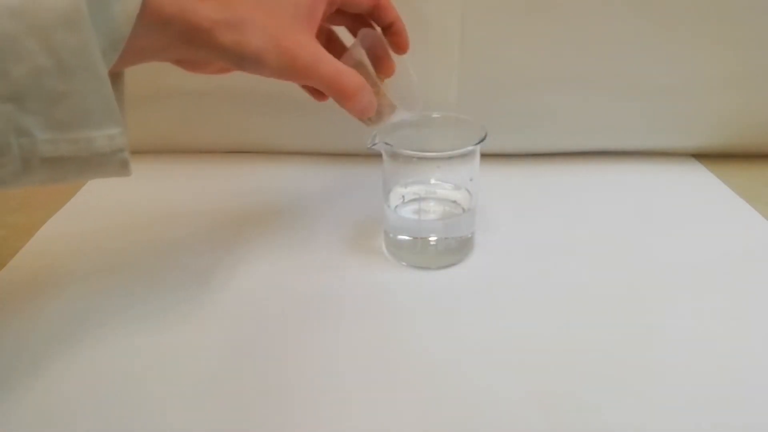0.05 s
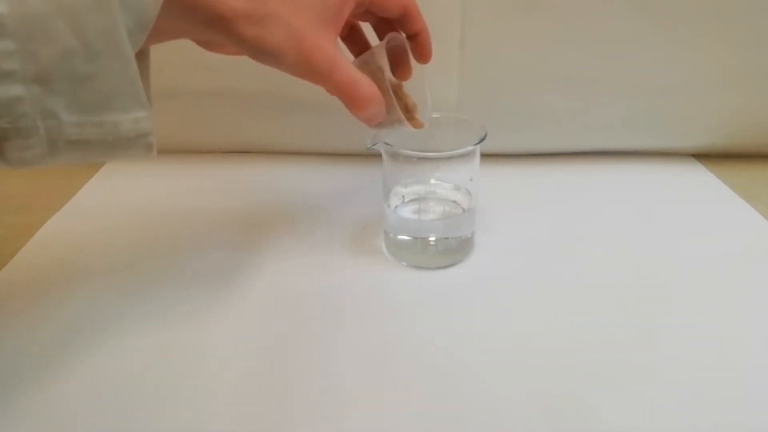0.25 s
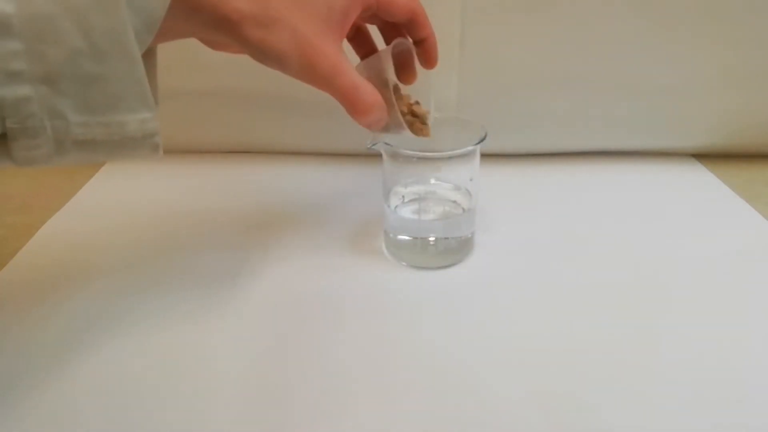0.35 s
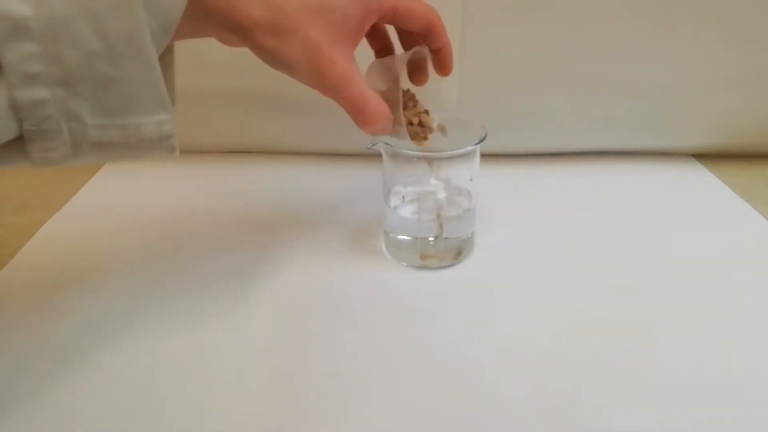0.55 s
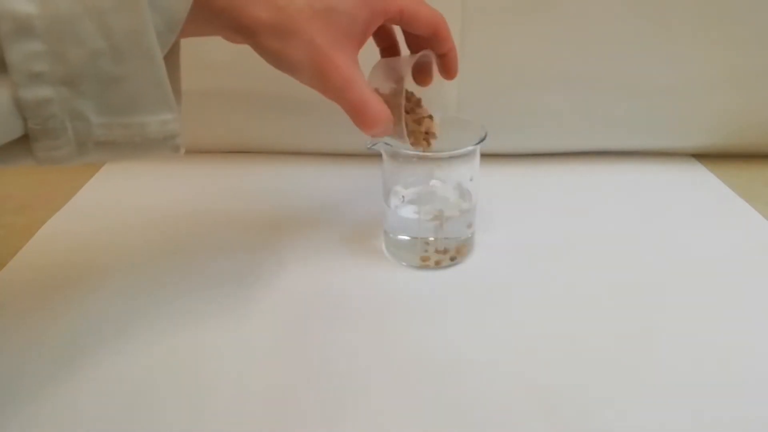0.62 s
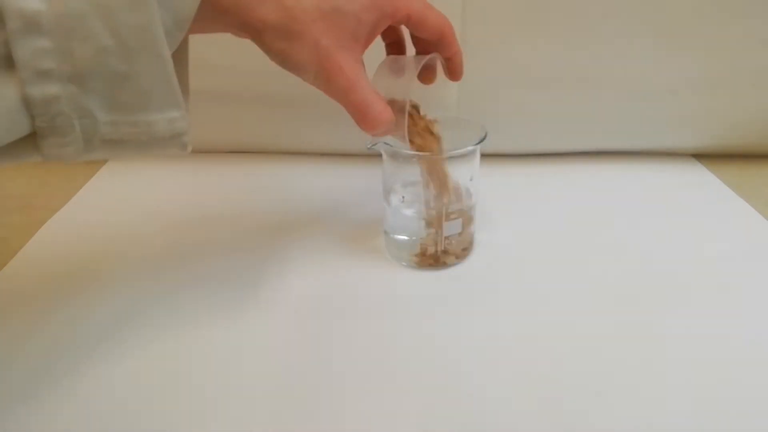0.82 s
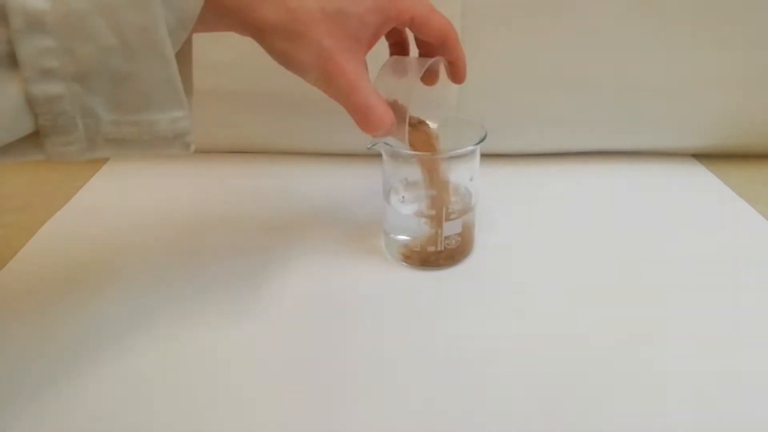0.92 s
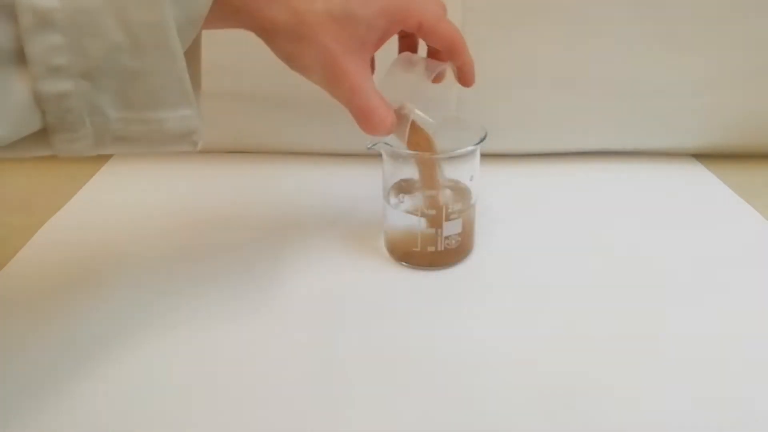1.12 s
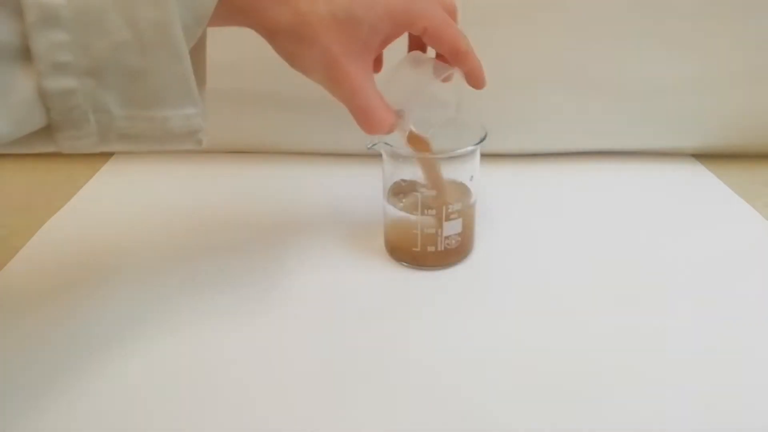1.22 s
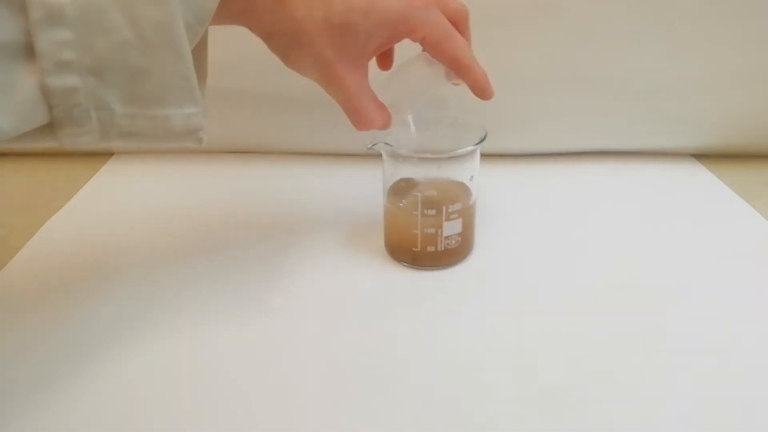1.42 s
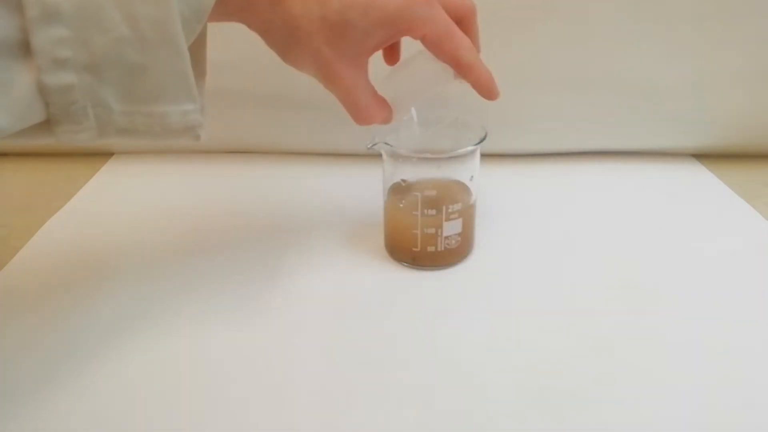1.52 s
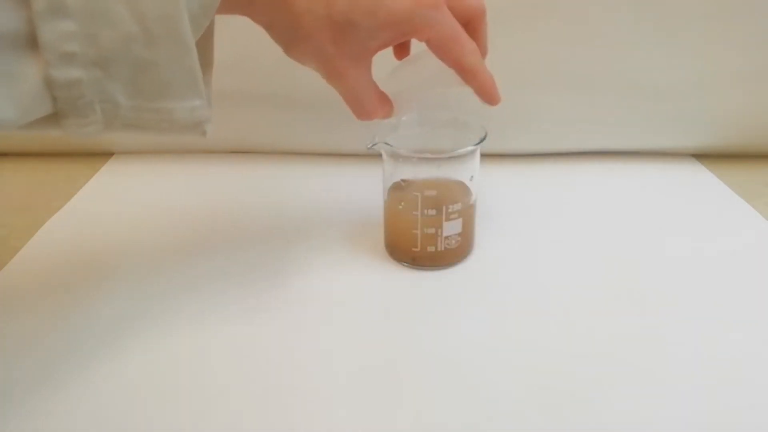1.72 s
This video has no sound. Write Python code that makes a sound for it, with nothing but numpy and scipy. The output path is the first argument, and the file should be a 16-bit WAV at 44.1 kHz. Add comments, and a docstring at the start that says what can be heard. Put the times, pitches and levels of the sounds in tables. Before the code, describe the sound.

Coarse grains pour into a glass beaker of water. A plastic dish knocks on the rim, grains tick and scrape down it, then splash in with a bubbly hiss that fades to faint fizz, close up in a quiet room.

```python
"""Salt poured into a beaker of water

A classroom with low ventilation noise. The glass beaker stands close to the right microphone; the
left one faces away. A small plastic dish knocks on the rim, and coarse salt ticks and scrapes down
it. The grains hit the water as a hiss of splashes and tiny ringing bubbles, with a few larger
plips. A faint fizz is left."""
import sys
import numpy as np
from scipy import signal
from scipy.fft import rfft, irfft
from scipy.io import wavfile

SR = 44100
rng = np.random.default_rng(int(sys.argv[2]) if len(sys.argv) > 2 else 0)


def to_wav(sig):
    """Store sig (one row per channel, or 1-D mono) as 16-bit WAV at the path in sys.argv[1].

    Samples outside -1..1 are clipped; the rate is SR.
    """
    pcm = np.clip(np.atleast_2d(sig), -1, 1) * 32767
    pcm = np.round(pcm).astype(np.int16)
    wavfile.write(sys.argv[1], SR, pcm.T)  # frames by channels


N = 77175
TIME = np.arange(N) / SR
LOW_PASS = signal.firwin(301, 15850, window=("kaiser", 9), fs=SR)

# spray thrown up by the salt (frequency [Hz], level [dB])
SPRAY_SPECTRUM = [(200, -26), (2500, -20), (4200, -34), (5500, -8.5), (7000, -8.5), (8300, -8), (9800, -2),
                  (11000, -6), (13000, 2.5), (16000, 0.5)]


def amp(db):
    """Decibels to gain."""
    return 10 ** (np.asarray(db) / 20)


def unit_energy(x):
    """Scales to energy 1."""
    return x / np.sqrt(np.sum(x ** 2) + 1e-20)


def unit_rms(x):
    """Scales to rms 1."""
    return x / np.sqrt(np.mean(x ** 2) + 1e-20)


def curve_at(points, hz):
    """Interpolates a curve on a log-frequency axis."""
    freqs, values = np.transpose(points)
    return np.interp(np.log(hz + 1), np.log(freqs + 1), values)


def envelope(table, column=1):
    """A column of a dB curve as gain over time."""
    rows = np.array(table)
    return amp(np.interp(TIME, rows[:, 0], rows[:, column]))


def swell(db, at_s, width_s):
    """A bell-shaped rise and fall of gain."""
    return amp(db) * np.exp(-((TIME - at_s) / width_s) ** 2)


def add(mix, at_s, sound):
    """Mixes a sound in at its time."""
    part = mix[max(round(at_s * SR), 0):][:len(sound)]
    part += sound[:len(part)]


def colour(x, spectrum):
    """Minimum-phase filter with the given spectrum."""
    log_gain = np.log(amp(curve_at(spectrum, abs(np.fft.fftfreq(2048, 1 / SR)))))
    taps = np.fft.ifft(np.exp(np.conj(signal.hilbert(log_gain)))).real[:1024]
    return signal.fftconvolve(x, taps)[:len(x)]


def band_limit(x):
    """Steep low-pass just under 16 kHz."""
    return signal.fftconvolve(x, LOW_PASS, "same")


def impact(scatter_s, scatter_db):
    """A sharp snap followed by a quickly dying scatter."""
    t = np.arange(2048) / SR
    scatter = rng.standard_normal(len(t)) * np.exp(-t / scatter_s) * (t > 0)
    return (t == 0) + amp(scatter_db) * unit_energy(scatter)


def mode(t, hz, db, t60):
    """One resonance of a struck object, falling 60 dB in t60 seconds."""
    return amp(db - 60 * t / t60) * np.sin(2 * np.pi * hz * t)


def patter(per_s, spread_db, count=1):
    """Trains of random impulses, most of them small and a few large."""
    chance, size, sign, train = rng.random((4, N))
    hits = np.flatnonzero(chance < per_s / SR)
    gain = amp(-spread_db * np.log(np.maximum(size[hits], .02)))
    out = np.zeros((count, N))
    out[(train[hits] * count).astype(int), hits] = np.sign(sign[hits] - .5) * gain
    return out


def shower(sounds, per_s, spread_db):
    """Each random impulse plays one of the given short sounds."""
    out = np.zeros(N)
    for train, sound in zip(patter(per_s, spread_db, count=len(sounds)), sounds):
        for i in np.flatnonzero(train):
            out[i:i + len(sound)] += train[i] * sound[:N - i]
    return out


def room_tone(hum_hz=198, boom_hz=78):
    """Low ventilation noise at both microphones, with a hum and one soft, deep swell."""
    # ventilation noise (frequency [Hz], density [dB per Hz])
    air_spectrum = [(20, -87), (60, -90), (120, -89), (160, -93.5), (230, -89.5), (330, -99), (600, -102),
                    (1200, -108), (3000, -112), (8000, -114), (16000, -114)]
    # its likeness at the two microphones (frequency [Hz], correlation [0-1])
    likeness = [(30, 0.56), (180, 0.93), (500, 0.57), (1500, 0), (16000, 0.067)]
    hz = np.fft.rfftfreq(N, 1 / SR)
    left, independent = rfft(rng.standard_normal((2, N)))
    shared = np.clip(curve_at(likeness, hz), 0, 1)
    right = shared * left + np.sqrt(1 - shared ** 2) * independent
    air = irfft(np.array([left, right]) * amp(curve_at(air_spectrum, hz)), N) * np.sqrt(SR / 2)
    hum = amp(-72) * np.sqrt(2) * np.sin(2 * np.pi * hum_hz * TIME)
    boom = swell(db=-56.5, at_s=1.056, width_s=.082) * np.sin(2 * np.pi * boom_hz * TIME)
    return air + hum + boom


def reverb(x, onset_s=.0035):
    """The classroom answers with one short, diffuse tail."""
    # reverberation time (frequency [Hz], t60 [s])
    decay_times = [(200, 0.3), (2000, 0.16), (8000, 0.1739), (16000, 0.5)]
    # strength of the tail (frequency [Hz], level [dB])
    tail_spectrum = [(200, -4.5), (2000, -8), (7500, -7.5), (10000, -6), (16000, -22)]
    hz, t, noise = signal.stft(rng.standard_normal(SR), SR, nperseg=256)
    decay = amp(-60 * t / curve_at(decay_times, hz)[:, None])
    decay /= np.sqrt(np.mean(decay ** 2, axis=1, keepdims=True) * SR)
    bands = noise * decay * amp(curve_at(tail_spectrum, hz))[:, None]
    tail = signal.istft(bands, SR, nperseg=256)[1][:SR]
    return signal.fftconvolve(x, tail * np.minimum(TIME[:SR] / onset_s, 1))[:N]


def far_side(x, lag_s=.0001, wander_s=.045, places=4):
    """The way to the left microphone: shaded, later, its reflections shifting as the grains scatter."""
    # direct sound from behind the microphone (frequency [Hz], gain [dB])
    shadow = [(300, -4), (1500, -10.5), (3500, -10.5), (5300, -12), (8000, -8), (10000, -18),
              (16000, -13.5)]
    shaded, out = colour(x, shadow), np.zeros(N)
    for place in range(places):
        share = np.maximum(np.cos(2 * np.pi * (TIME / wander_s + place / places)), 0) ** 2
        reflections = impact(scatter_s=.0029, scatter_db=6.5)  # off table, hand and wall
        out += signal.fftconvolve(share * shaded, reflections)[:N]
    return np.pad(out, (round(lag_s * SR), 0))[:N]


def knocks():
    """The dish and lumps of salt knock on the beaker: a hollow tock and a short ring of glass."""
    # knocks (time [s], level [dB], pitch [ratio], ring relative to the knock [dB])
    strikes = [(0.0402, -16.5, 1.046, 1.5), (0.2222, -29, 0.8, -6), (.276, -23.5, 1.35, 3),
               (.383, -26, 1.16, -2), (0.447, -29, 1.07, -5), (.479, -26.5, 0.94, -4),
               (.732, -24.5, 0.93, -11), (1.116, -28, 0.83, 0)]
    # the tock at pitch 1 (frequency [Hz], level [dB])
    tock_spectrum = [(60, -9.5), (350, -8), (550, -6.5), (800, -4), (1200, 3), (2000, 3.5), (2700, -14.5),
                     (6000, -11.5), (16000, -26)]
    # resonances of the glass (frequency [Hz], level [dB], t60 [s])
    glass_modes = [(1167, -31, 0.074), (3140, -41, 0.099), (4700, -72, 0.13)]
    ring = sum(mode(TIME[:SR // 3], hz, db, t60) for hz, db, t60 in glass_modes)
    out = np.zeros(N)
    for at_s, db, pitch, ring_db in strikes:
        spectrum = [(hz * pitch, band_db) for hz, band_db in tock_spectrum]
        tock = colour(impact(scatter_s=.0056, scatter_db=-3), spectrum)
        add(out, at_s, amp(db) * unit_energy(tock))
        add(out, at_s, amp(db + ring_db) * ring)
    return out


def grain(snap):
    """One grain's snap rattles briefly around the dish."""
    return signal.fftconvolve(impact(scatter_s=.0015, scatter_db=5), snap)


def dish(lead_samples=100):
    """Single grains snap against the plastic and set it ringing; the rest slide and scrape down it."""
    # single grains (time [s], level [dB], lift of the ring and of the band below 7.5 kHz [dB])
    strikes = [(0.0158, -26.5, 3), (0.0207, -20.5, -10), (0.0887, -28.5, -26), (0.1364, -19, -7.5),
               (.156, -21.5, 3.5), (0.1818, -8, -3.5), (0.188, -17.5, 3), (0.2011, -14.5, 6),
               (.2098, 9, -3), (0.2219, -4, 1), (0.2292, -7, 1), (0.244, -8, -3), (0.2468, 0, 1),
               (0.2678, -10, -5.5), (0.2737, -9.5, -1), (0.2826, -10, -9), (.3010, -8, -6),
               (0.3104, -8.5, 3.5), (0.3182, -10.5, 2), (0.332, -7, 0), (0.3547, -5, 7), (.3578, -8, -23),
               (0.4544, -10, -12), (0.4795, -17, -2), (0.4929, -12, -1.5), (0.527, -17.5, -12),
               (0.5948, -13, -1.5), (1.118, -8.5, -16), (1.1568, -16.5, -28), (1.176, -16, -5),
               (1.307, -18, -18), (1.3256, -19.5, -23), (1.335, -18, -6.5), (1.3585, -25, -14),
               (1.405, -31, -8), (1.415, -27, -13), (1.475, -29.5, -7), (1.564, -35.5, 9.5)]
    # a grain on plastic (frequency [Hz], level [dB])
    snap_spectrum = [(100, -40), (600, -37), (1200, -18), (1900, -21.5), (2550, -22), (3300, -20),
                     (4800, -14), (5800, -4), (7000, -4), (9000, -3), (10300, -0.5), (13000, -1),
                     (16000, 0)]
    # resonances of the thin plastic (frequency [Hz], level [dB])
    plastic_modes = [(7090, -50.5), (7520, -48), (7945, -51), (10080, -57)]
    # loose grains sliding (time [s], level [dB])
    slide_levels = [(0, -84), (.03, -56), (.11, -90), (.17, -62), (.205, -67), (.222, -38), (.29, -38.5),
                    (.34, -55), (.385, -40), (.44, -44.5), (.5, -47.5), (.545, -54), (.78, -41),
                    (1.1, -46.5), (1.3, -51), (1.45, -92)]
    # the mass of salt scraping (time [s], level [dB])
    scrape_levels = [(0, -66), (.19, -70), (.22, -47.5), (.3, -48.5), (.39, -48), (.46, -53.5),
                     (.53, -58.5), (.6, -56), (.68, -57.5), (.8, -50), (.88, -67), (1, -60.5),
                     (1.15, -65.5), (1.35, -71.5), (1.5, -84)]
    # its rasp (frequency [Hz], level [dB])
    rasp_spectrum = [(200, -25.5), (700, -13.5), (1200, -7.5), (2000, 2), (2600, -5), (3250, 3.5),
                     (4000, 1.5), (4600, 6), (6000, -0.5), (8000, -11), (11000, -31), (16000, -19)]
    snap = band_limit(colour(signal.unit_impulse(400, lead_samples), snap_spectrum))
    ring = sum(mode(TIME, hz, db, t60=.2) for hz, db in plastic_modes)
    ticks = np.zeros(N)
    for at_s, db, lift_db in strikes:
        tick = colour(grain(snap), [(7500, lift_db), (11500, 0)])
        add(ticks, at_s - lead_samples / SR, amp(db) * unit_energy(tick))
        add(ticks, at_s, amp(db + lift_db) * ring)
    grains = [unit_energy(grain(snap)) for _ in range(8)]
    slide = envelope(slide_levels) * unit_rms(shower(grains, per_s=2200, spread_db=2.5))
    last_grains = swell(db=-28, at_s=1.19, width_s=.1) * shower(grains, per_s=160, spread_db=2)
    rasp = colour(patter(per_s=2200, spread_db=3.5)[0], rasp_spectrum)
    return ticks + slide + last_grains + envelope(scrape_levels) * unit_rms(rasp)


def resonate(x, hz, width_hz):
    """The narrow band of a sound that one resonance picks out."""
    return signal.lfilter(*signal.iirpeak(hz, hz / width_hz, SR), x)


def hollow(x):
    """The beaker's hollow strengthens the pitches at which it resonates."""
    # resonances (frequency [Hz], width [Hz], gain of the added band [dB])
    cavity_modes = [(1120, 86, 3.5), (3195, 130, 5), (5280, 100, -1), (5545, 48, 9), (6000, 83, -2),
                    (6650, 100, -6), (9940, 220, 4), (11900, 300, -4.5), (12600, 140, -8.5)]
    return x + sum(amp(db) * resonate(x, hz, width_hz) for hz, width_hz, db in cavity_modes)


def clumps(ring_db=7):
    """Small clumps slap the water: short bursts of spray that ring in the beaker."""
    # slaps (time [s], starting level [dB], decay [s])
    slaps = [(.558, -36.5, 0.0057), (0.57, -35, 0.0044), (0.602, -30, 0.011), (0.642, -35, .002),
             (0.651, -32.5, 0.0033), (0.661, -34.5, 0.0044), (0.6797, -26, 0.006), (0.692, -27, 0.0015),
             (0.696, -31, 0.0047), (.705, -27, 0.0045), (0.724, -35, 0.0029), (0.808, -32.5, 0.0078),
             (0.819, -25.5, 0.0043), (0.869, -33.5, 0.0033), (0.877, -29.5, 0.0064)]
    # bright resonances, narrower the longer they ring (frequency [Hz], level [dB], ring scale [s])
    splash_modes = [(6230, -8, 0.016), (10080, -1.5, 0.012), (12150, -3, 0.02), (12700, -1.5, 0.031),
                    (13600, 4.5, 0.015), (14900, 2, 0.0087)]
    out, t = np.zeros(N), TIME[:SR // 20]
    for at_s, db, decay_s in slaps:
        noise = rng.standard_normal(len(t))
        spray = unit_rms(band_limit(colour(noise, SPRAY_SPECTRUM)))
        ring = sum(amp(mode_db) * unit_rms(resonate(noise, hz, width_hz=4.2 / ring_s))
                   for hz, mode_db, ring_s in splash_modes)
        burst = unit_rms(spray + amp(ring_db) * unit_rms(ring))
        add(out, at_s, amp(db) * burst * np.exp(-t / decay_s))
    return out


def bubble(hz, decay_s, attack_s=.00012, glide_per_s=.64):
    """A ringing bubble whose pitch rises a little."""
    t = np.arange(0, 7 * decay_s, 1 / SR)
    gain = (1 - np.exp(-t / attack_s)) * np.exp(-t / decay_s)
    return gain * np.sin(2 * np.pi * hz * t * (1 + glide_per_s * t / 2))


def plips():
    """Now and then a single bubble rings out above the hiss."""
    # bubbles (time [s], pitch [Hz], level [dB], decay [s])
    bubbles = [(.571, 15000, -30, .004), (0.575, 1666, -45, 0.0043), (0.604, 13700, -30, .005),
               (0.606, 1362, -48.5, 0.018), (0.682, 10080, -23, 0.0024), (0.812, 3180, -36.5, 0.0045),
               (0.812, 1483, -43, 0.011), (.816, 6140, -33, 0.01), (0.846, 1315, -47, 0.006),
               (0.866, 1695, -38, 0.0054), (0.868, 5652, -34.5, 0.011), (.884, 5080, -38, 0.014),
               (0.891, 1194, -43.5, 0.015), (0.95, 6190, -33, 0.0048), (.962, 3455, -43, .005),
               (.966, 5040, -43, 0.011), (1.018, 6680, -35, 0.0059), (1.038, 1917, -49, 0.0091),
               (1.052, 3650, -31.5, 0.0018), (1.054, 3850, -44.5, 0.011)]
    out = np.zeros(N)
    for at_s, hz, db, decay_s in bubbles:
        add(out, at_s, amp(db) * bubble(hz, decay_s))
    return out


def water():
    """Grains splash in and drag down bubbles: middling ones gurgle, the finest fizz on afterwards."""
    # flow of salt into the water (time [s], hiss level [dB], deep splash level [dB])
    pour = [(.54, -67, -75), (.6, -47.5, -56.5), (.645, -45, -60.5), (.69, -42.5, -63.5), (.75, -41.5, -59),
            (.82, -43, -57.5), (.85, -44, -48), (.88, -38, -55), (.95, -37, -55), (1.01, -39, -62.5),
            (1.1, -42.5, -64.5), (1.2, -51, -68.5), (1.31, -52.5, -76), (1.39, -60.5, -84),
            (1.48, -67.5, -94), (1.62, -66.5, -88), (1.75, -76, -100)]
    # the deep splash (frequency [Hz], level [dB])
    deep_spectrum = [(100, -11.5), (800, -10), (1200, -6), (1800, -8.5), (2600, -30), (3250, 2.5),
                     (3700, -1), (4200, -18), (5400, -4.5), (7000, -7.5), (12000, -41)]
    # the lingering froth (frequency [Hz], level [dB])
    froth_spectrum = [(3000, -6), (6500, -10), (11000, -9), (12700, 9), (13800, 2), (15200, 11)]
    tiny = [unit_energy(bubble(hz, decay_s=16 / hz)) for hz in np.linspace(5257, 15340, 60)]
    fizz = shower(tiny, per_s=3100, spread_db=3)
    splashes = patter(per_s=7400, spread_db=7.5)[0]
    spray = colour(unit_rms(splashes) + amp(-.5) * unit_rms(fizz), SPRAY_SPECTRUM)
    hiss = envelope(pour) * unit_rms(band_limit(hollow(spray)))
    deep_splashes = colour(patter(per_s=900, spread_db=3)[0], deep_spectrum)
    deep = envelope(pour, column=2) * unit_rms(hollow(deep_splashes))
    froth = swell(db=-64.5, at_s=1.25, width_s=.65) * unit_rms(colour(fizz, froth_spectrum))
    middling = [bubble(hz, decay_s=.007) for hz in np.linspace(4910, 7620, 60)]
    gurgle = amp(-13.5) * envelope(pour) * unit_rms(hollow(shower(middling, per_s=300, spread_db=3)))
    return hiss + deep + froth + gurgle


def scene():
    """The beaker is close to the right microphone; the left hears it later, duller and more scattered."""
    # response of the duller left microphone (frequency [Hz], gain [dB])
    left_response = [(500, 1.5), (2000, -1), (4000, 1.5), (7800, 2), (9000, -0.5), (11000, -16),
                     (13000, -9), (16000, -30.5)]
    sources = [dish(), knocks(), clumps(), water() + plips()]
    near = sum(sources)
    far = sum(far_side(source) for source in sources)
    left = colour(far + reverb(near), left_response)
    right = near + reverb(near)
    return np.array([left, right]) + room_tone()


def record(dry):
    """The recorder cuts the highest treble on both channels."""
    return np.array([band_limit(channel) for channel in dry])


dry = scene()
out = record(dry)
to_wav(out)
```